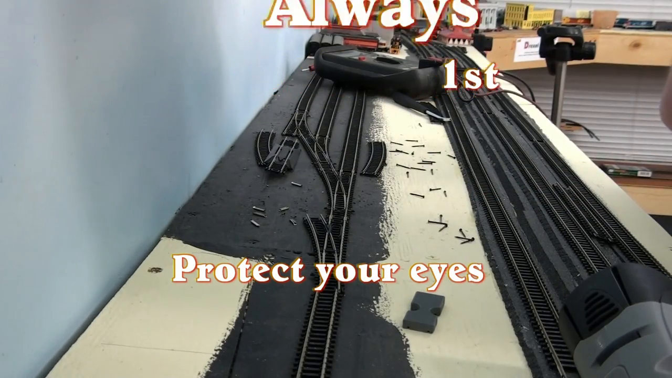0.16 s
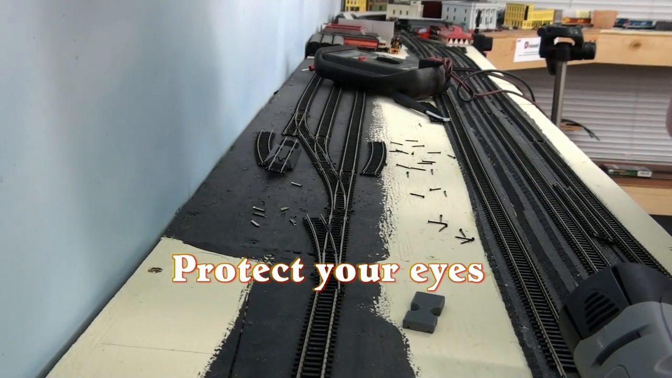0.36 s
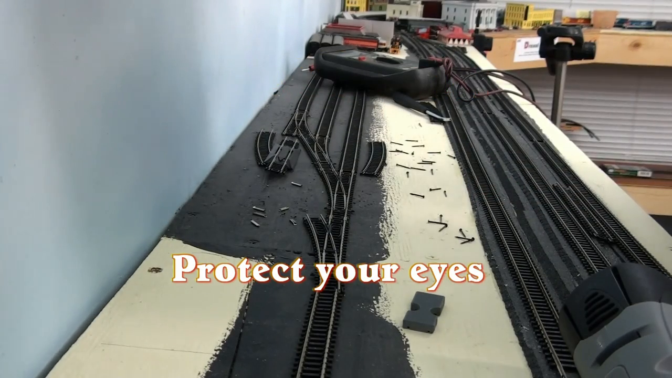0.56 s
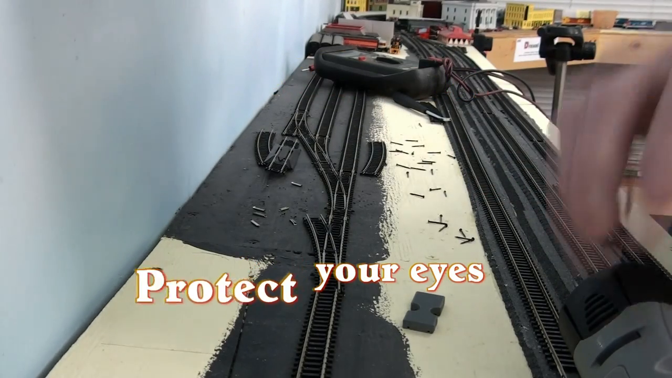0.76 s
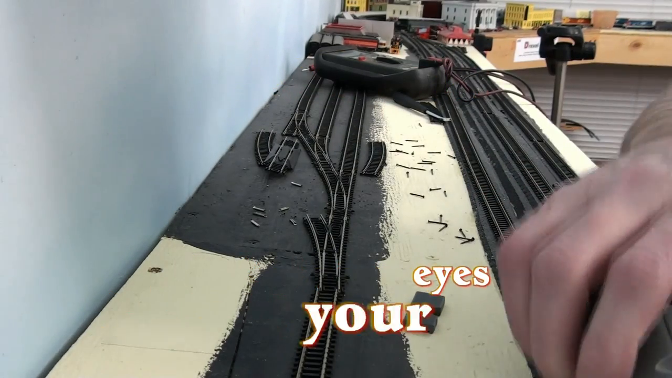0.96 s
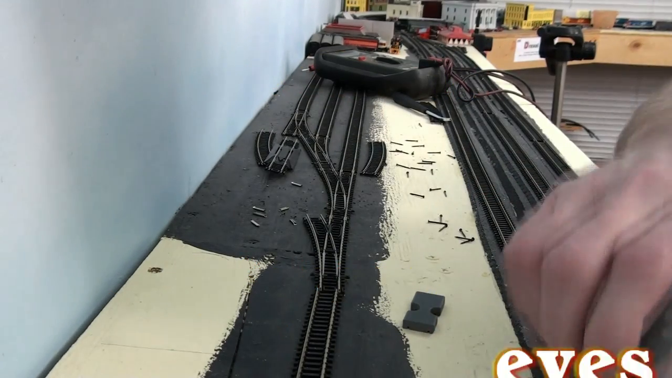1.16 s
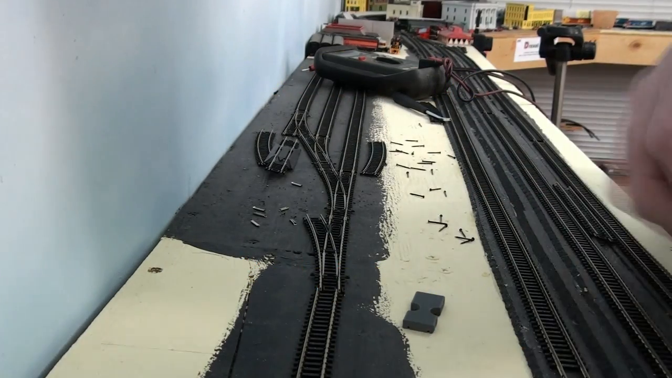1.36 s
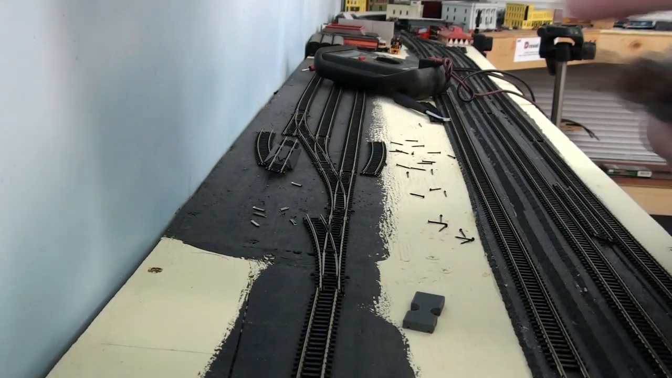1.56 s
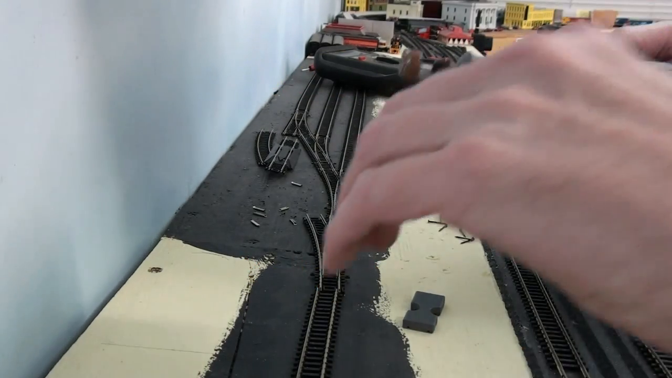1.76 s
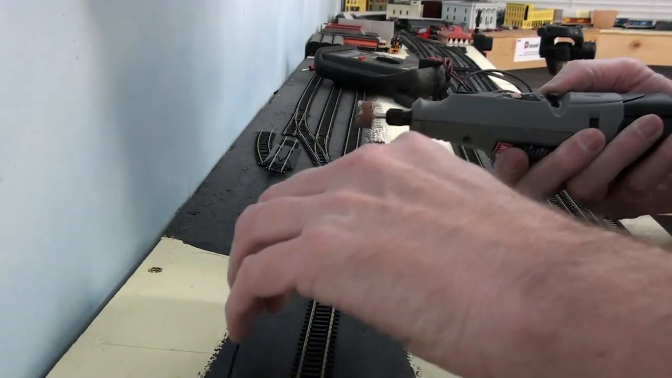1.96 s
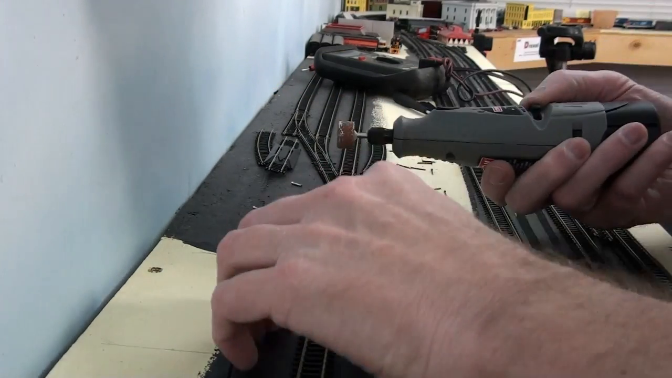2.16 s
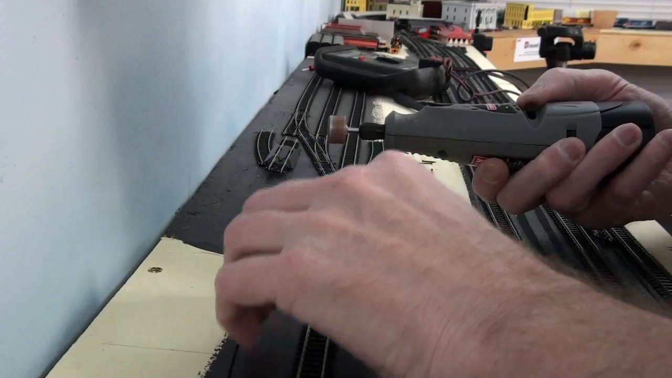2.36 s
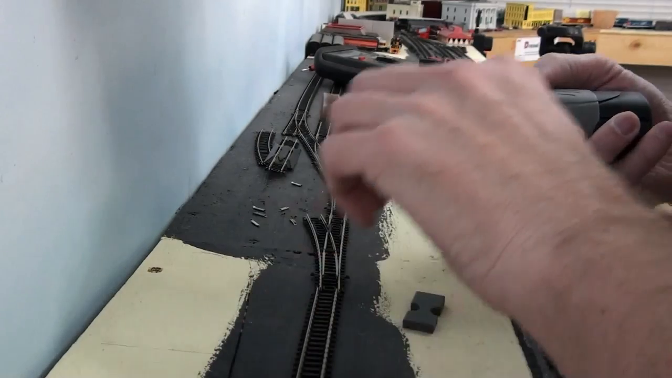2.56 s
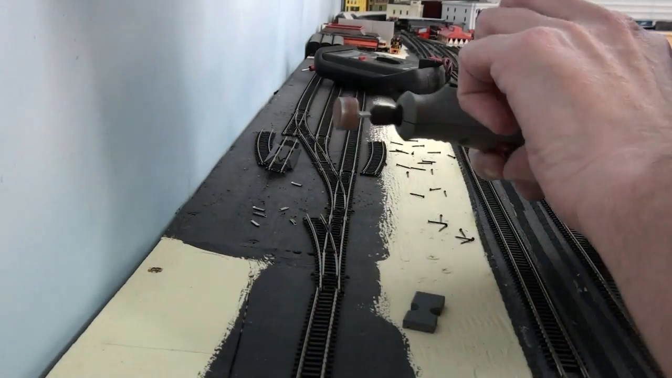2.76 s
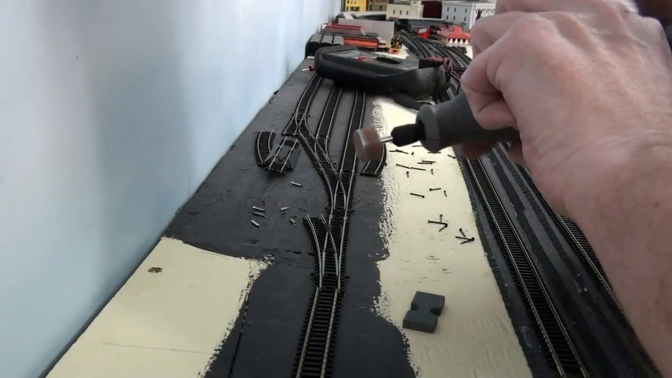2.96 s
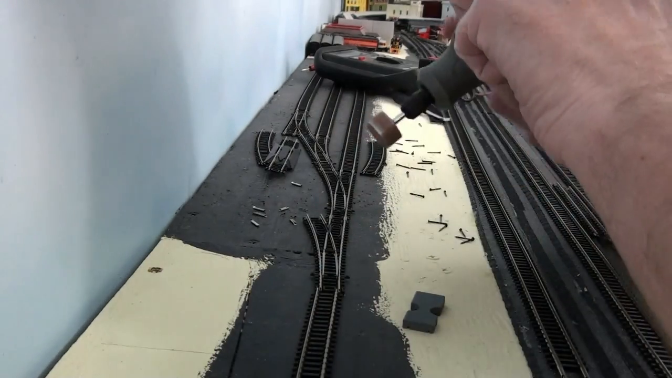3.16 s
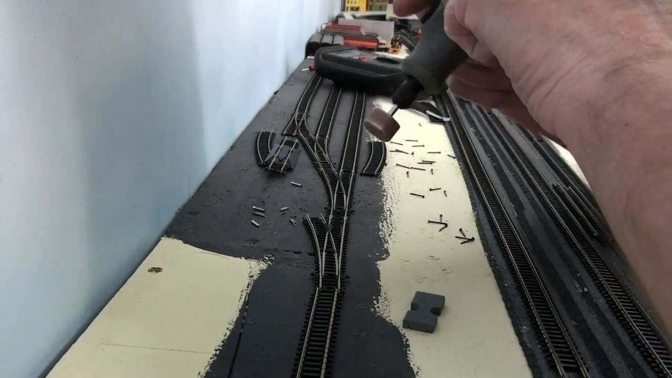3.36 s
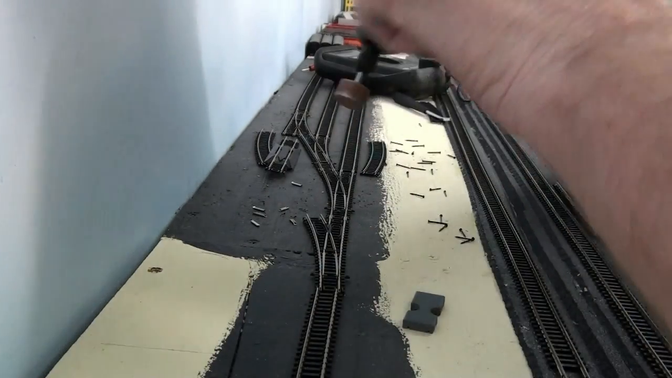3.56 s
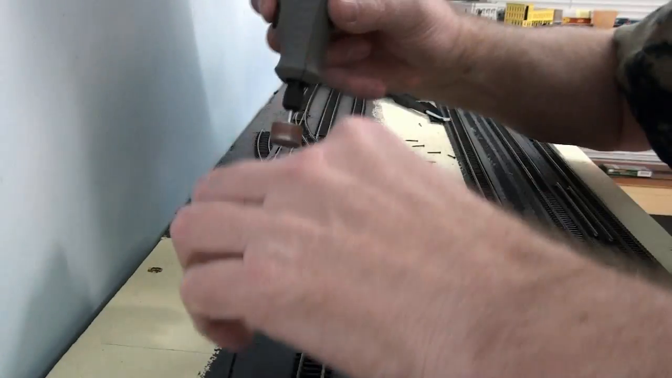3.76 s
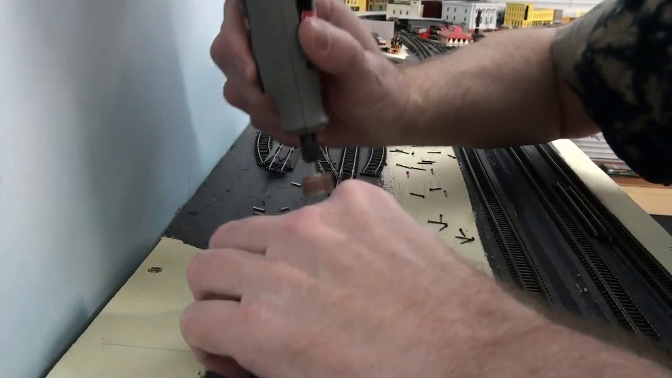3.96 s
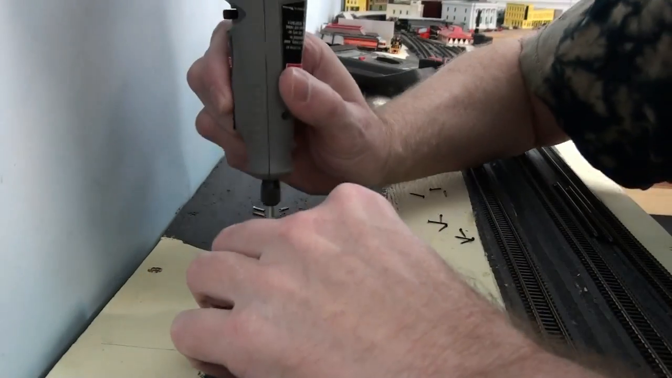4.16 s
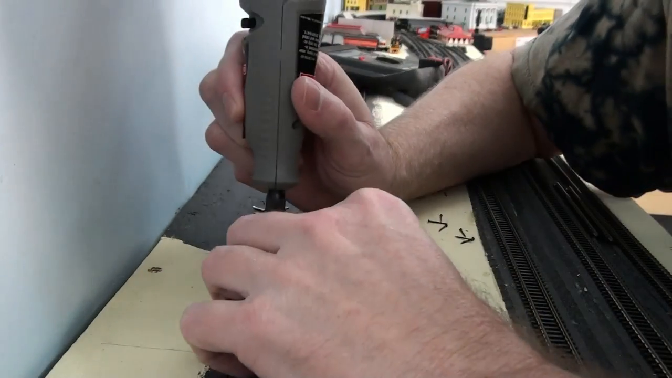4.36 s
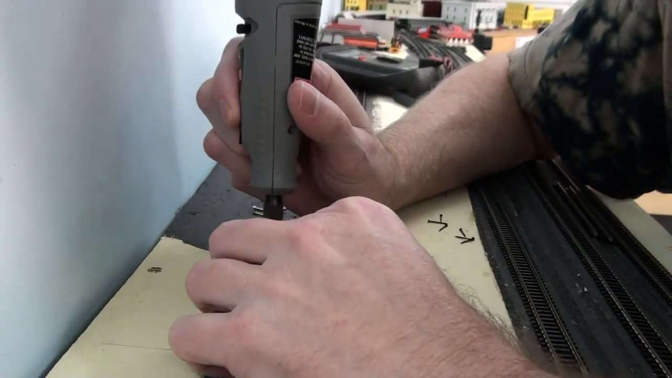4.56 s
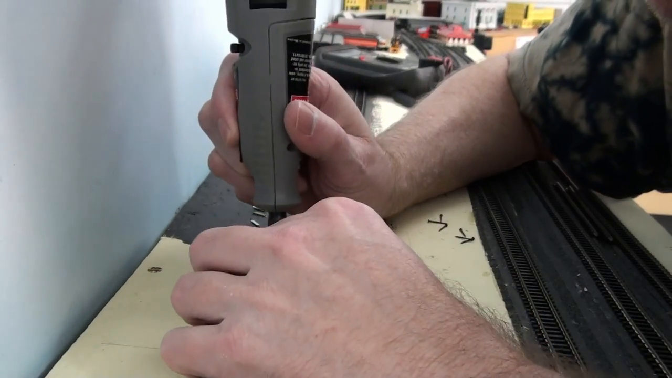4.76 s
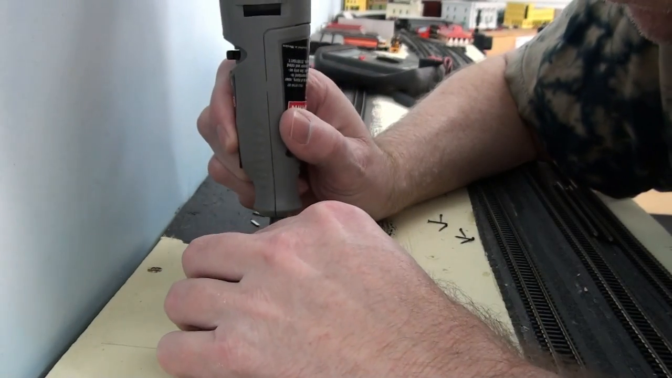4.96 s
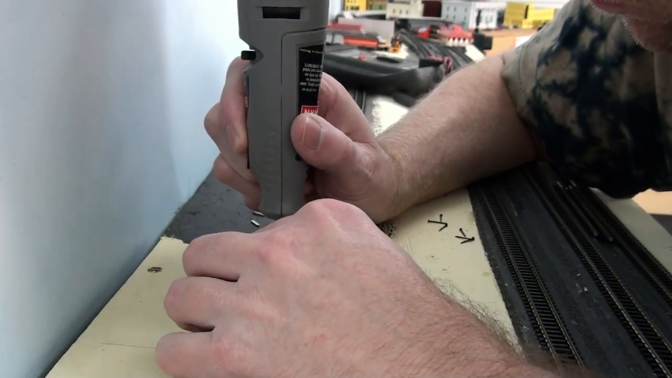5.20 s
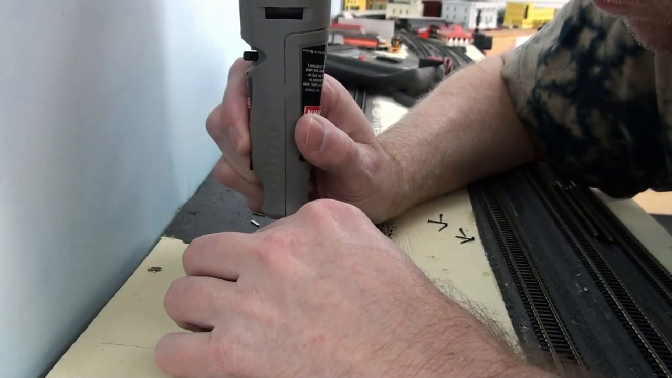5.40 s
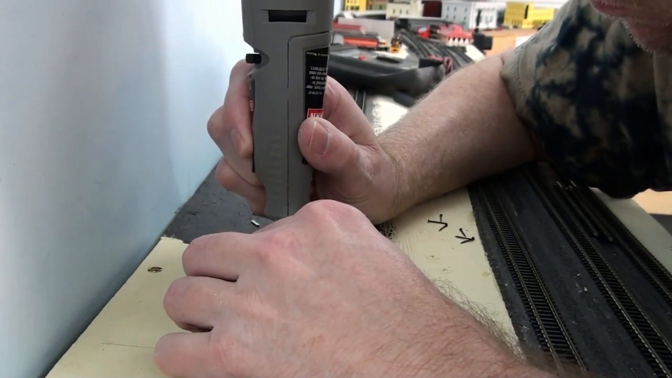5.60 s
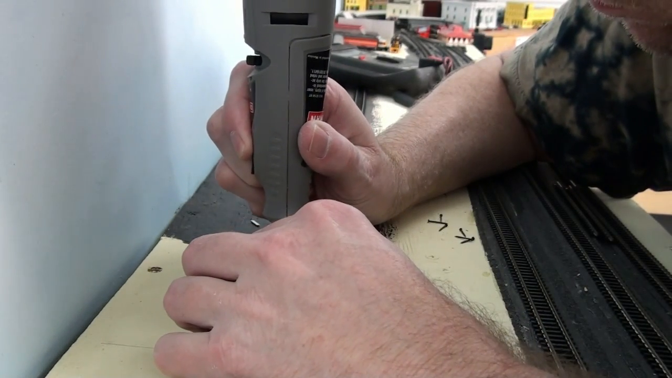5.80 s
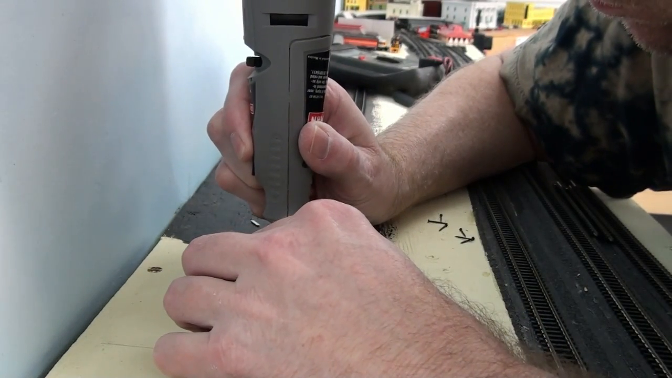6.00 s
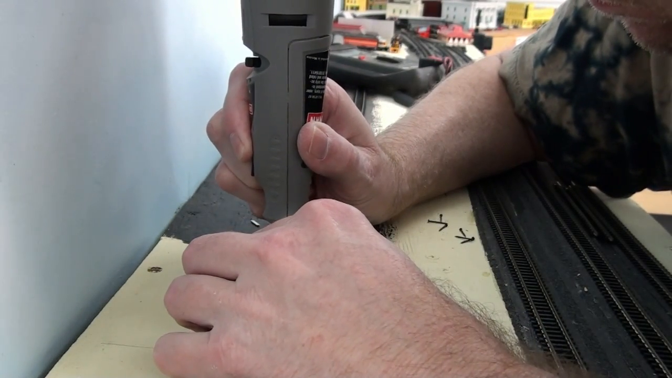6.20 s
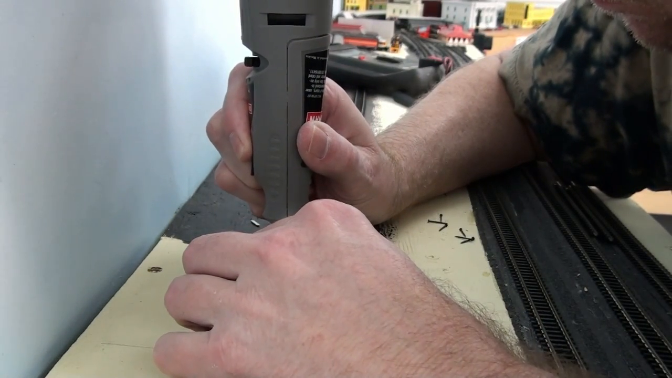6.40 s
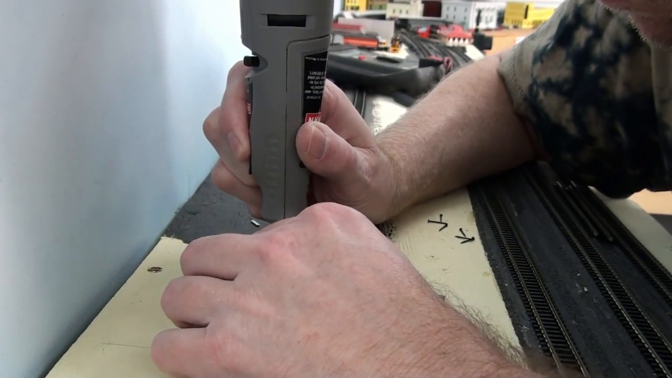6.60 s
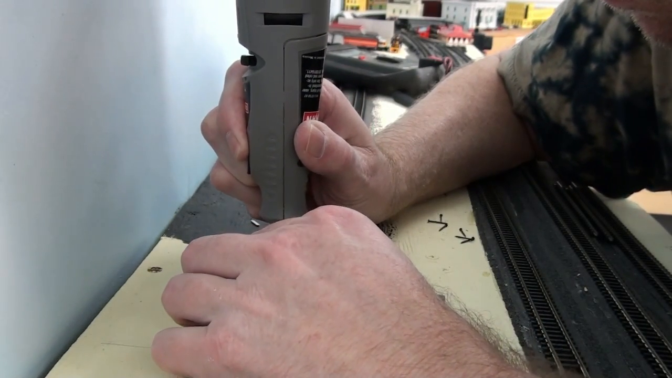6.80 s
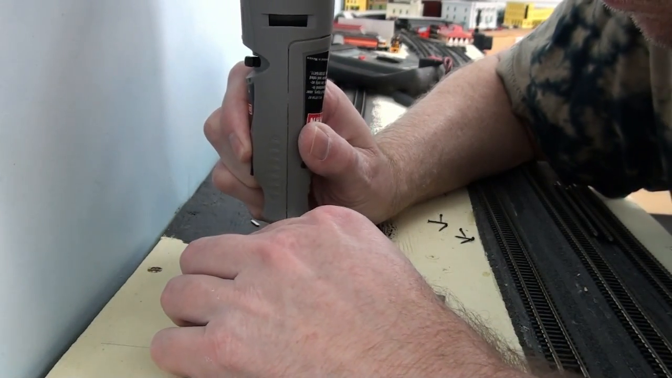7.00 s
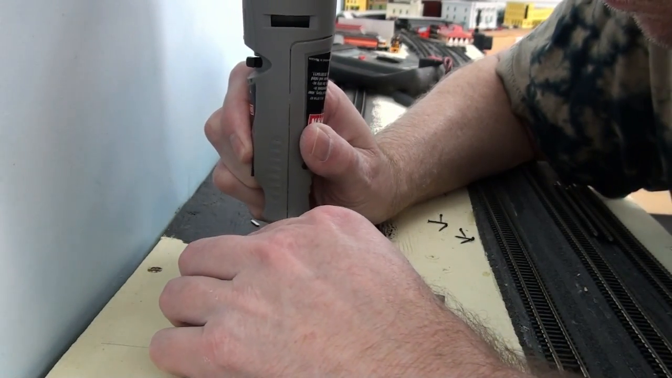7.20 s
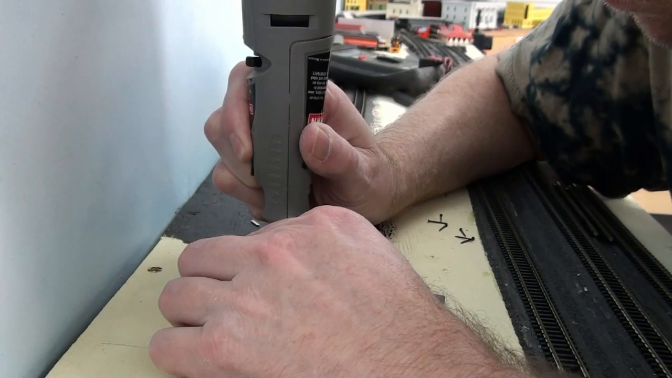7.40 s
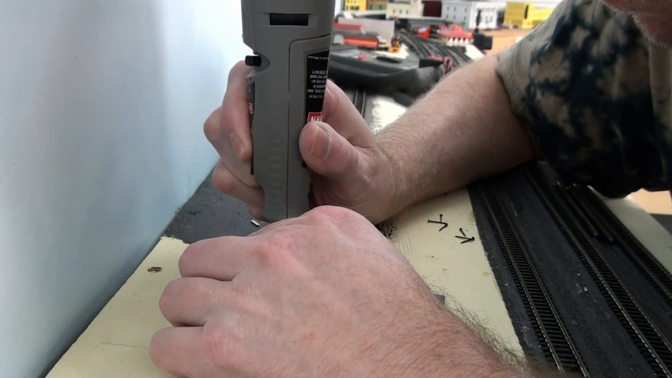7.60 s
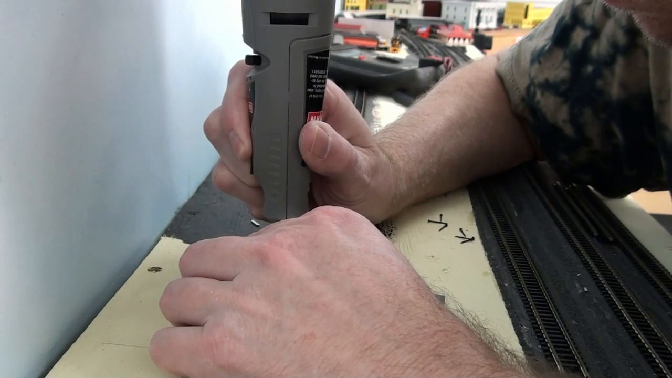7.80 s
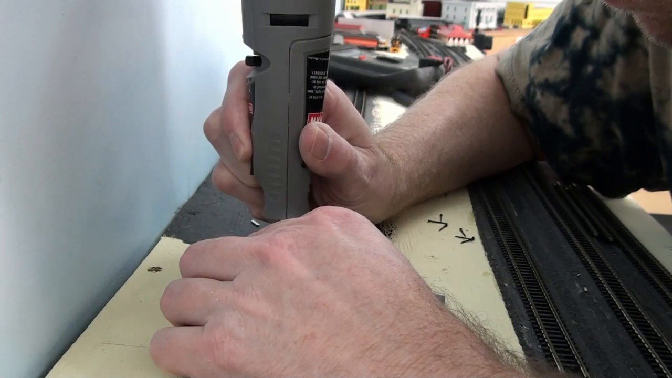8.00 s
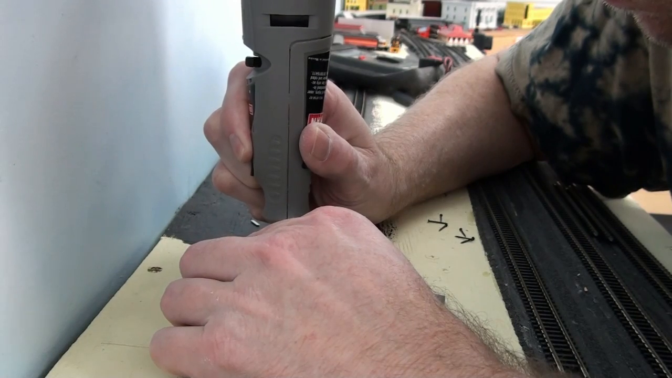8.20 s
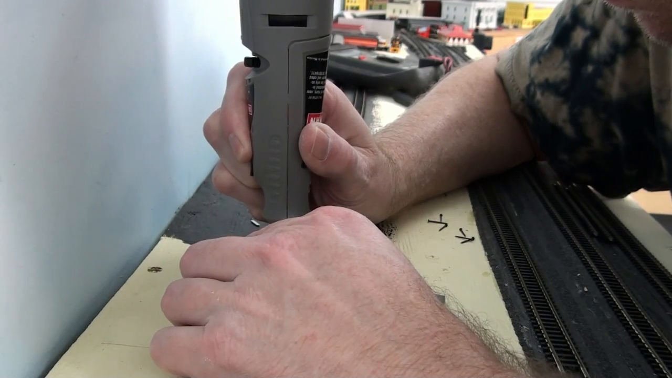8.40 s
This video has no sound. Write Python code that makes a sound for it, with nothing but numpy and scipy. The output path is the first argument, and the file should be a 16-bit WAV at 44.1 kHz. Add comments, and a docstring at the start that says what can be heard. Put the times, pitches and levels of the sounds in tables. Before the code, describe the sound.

In a quiet small room, hands rub and knock a plastic tool softly on a board. A switch clicks and a small electric motor spins up quickly into a raspy, buzzing whine. A few dull bumps follow as it is steadied upright. Then the wheel kicks in short sharp bites on a metal rail, whines free again, and finally grinds in a harsh, rattling chatter. Close stereo microphone.

```python
"""A handheld rotary tool on a model railway board, heard by a close stereo microphone in a small room.
Its motor whines in harmonics of the shaft rate over a draught of air; shell and brushes add a contact noise
that repeats every turn. The tool is picked up, switched on and turned upright over the track. Its wheel kicks
on a rail end and chatters along it, about one bite a turn: grit bursts, rail and track rattle, the board drums
and the shaft is braked. Hand strokes, knocks, board rumble and quiet room tone lie around it."""
import sys
import numpy as np
from scipy import signal
from scipy.fft import rfft, irfft
from scipy.io import wavfile
from scipy.ndimage import uniform_filter1d

SR = 44100
rng = np.random.default_rng(int(sys.argv[2]) if len(sys.argv) > 2 else 0)


def write(x):
    x = np.atleast_2d(x).T
    wavfile.write(sys.argv[1], SR, np.round(np.clip(x, -1, 1) * 32767).astype(np.int16))


N = 372644

# Room. Colour of the quiet room tone: pitch_hz, relative_level_db
ROOM_TONE = [(15, -34), (28, -12), (55, 2), (180, -3), (260, -7), (400, -6), (700, -18), (2050, -20),
             (2480, -22), (5280, -25), (13200, -26), (16000, -31)]
# Colour of the reflections from wall and board: pitch_hz, relative_level_db
WALL_COLOUR = [(60, -14), (250, -11), (500, -1), (1500, -1), (2900, 0), (4500, 3), (7000, 2), (9000, -3),
               (13000, -9)]

# Board. Modes of the board with its track: pitch_hz, decay_t60_s, relative_level_db
BOARD_MODES = [(87, 0.091, -9), (111.8, 0.47, -18.5), (160, 0.22, -8), (220, 0.12, 2.5), (251, 0.2, 4.5),
               (281, 0.045, 0), (454, 0.098, -7.5), (495, 0.39, -11.5), (530, 0.033, -5), (751, 0.12, -5),
               (822, 0.16, -13), (1118, 0.28, -10), (1432, 0.047, -6.5)]
# Resting hand shifting its weight on the board: start_s, swell_s, release_t60_s, peak_db
WEIGHT_SHIFTS = [(4.005, 0.028, 0.88, -36), (4.22, 0.072, .5, -39.5), (4.33, 0.082, 1, -43.5),
                 (4.86, 0.075, 1.0, -46)]
# Colour of the board's rumble: pitch_hz, relative_level_db
RUMBLE_COLOUR = [(25, -31), (60, 3), (100, 7), (170, 0), (245, 6.5), (330, -2), (480, -1), (750, -9),
                 (1300, -10), (4000, -35)]

# Hands. Strokes of hand and sleeve over the tool: start_s, swell_s, release_t60_s, relative_peak_db
RUBS = [(.881, 0.0085, 0.34, -35), (.93, 0.17, 0.14, -42.5), (1.22, 0.14, 0.67, -41.5),
        (1.37, .065, 0.33, -37.5), (1.49, 0.0093, 0.23, -41), (1.75, 0.061, 0.38, -49),
        (1.97, .03, 0.32, -59), (2.07, 0.033, 0.18, -57.5)]
# Grip during the pick-up: time_s, cupped_hand_hz, case_ring_db
GRIP = [(.9, 2000, -16), (1.08, 2000, -3), (1.27, 1980, -16), (1.35, 2010, -12), (1.43, 1780, -21),
        (1.52, 1860, -20), (1.82, 2100, -5)]
# Colour of skin and cloth sliding: pitch_hz, relative_level_db
SLIDE_COLOUR = [(530, -52), (900, -25), (1490, -13), (1850, -0.5), (2450, -6), (2860, -2.5), (3470, -12),
                (4200, -5), (6410, -2), (9090, 2), (10400, -3.5), (12300, -6), (16000, -52)]
# Colour of the rubbing passed to the board: pitch_hz, relative_level_db
RUB_RUMBLE_COLOUR = [(50, -7), (170, -2), (280, -6), (600, -17), (2000, -15.5)]
# Blows of hand, tool and switch: time_s, click_db, click_centre_hz, click_t60_s, board_db
KNOCKS = [(0.899, -37, 5000, .03, -38), (0.913, -24.5, 9000, 0.0072, -43), (0.992, -40, 4500, .015, -42),
          (1.1, -30.5, 374, 0.048, -29), (1.1, -35, 5000, .012, -58), (1.138, -25, 6500, 0.012, -42),
          (1.159, -37.5, 1660, 0.16, -30), (1.175, -32.5, 2450, 0.029, -34), (2.239, -39, 4450, 0.05, -33),
          (2.243, -36.5, 550, 0.093, -35.5), (2.355, -30, 7000, 0.036, -70),
          (2.364, -25.5, 1030, 0.048, -57), (2.363, -19, 8600, 0.027, -60), (4.007, -32, 600, 0.056, -30.5),
          (4.031, -28.5, 1200, 0.02, -37), (4.345, -34.5, 720, .058, -32.5), (4.385, -34, 700, 0.052, -34),
          (4.407, -26, 1010, 0.062, -34.5), (4.479, -32, 800, 0.024, -37), (4.568, -39, 746, 0.051, -50)]

# Cut. Wheel kicking on the rail end: time_s, click_db, click_centre_hz, click_t60_s, board_db
KICKS = [(6.172, -11, 3600, 0.0098, -24), (6.180, -12.5, 2800, 0.013, -24),
         (6.250, -12.5, 1640, 0.016, -18), (6.306, -9.5, 2290, 0.0073, -32),
         (6.314, -11.5, 1980, 0.016, -20)]
# Runs of bites: first_bite_s, last_bite_s, spacing_turns, relative_level_db
BITE_RUNS = [(5.992, 6.001, 1, -12), (6.052, 6.061, 1, -2), (6.070, 6.097, 1, -1), (6.106, 6.106, 1, -10),
             (6.218, 6.218, 1, -2), (6.289, 6.289, 1, -2), (6.397, 6.397, 1, -10), (7.257, 7.275, 1, -2),
             (7.353, 7.362, 1, -1), (7.405, 7.440, 1, -2), (7.458, 7.458, 1, 1), (7.475, 7.599, 1, -1),
             (7.625, 7.625, 1, 0), (7.652, 7.652, 1, -5), (7.661, 7.661, 1, 0), (7.678, 7.849, 1, 0),
             (7.858, 7.902, 1, -2), (7.919, 7.919, 1, 0), (7.937, 7.937, 1, -4), (7.955, 8.009, 2, -.5),
             (8.020, 8.037, 1, 0), (8.055, 8.090, 4, 1), (8.108, 8.108, 1, 0), (8.125, 8.144, 1, 0),
             (8.161, 8.180, 1, 0), (8.208, 8.208, 1, 1), (8.243, 8.279, 1, 0), (8.296, 8.296, 1, 1),
             (8.333, 8.350, 2, 0), (8.367, 8.447, 1, 0)]
# Cut: time_s, grit_body_gain_db, bounce (0 wheel seated, 1 hopping)
CUT = [(6.1, 4, 0.33), (7.26, -3.5, 0.4), (7.44, -4.5, 0.35), (7.48, -4, 0.043), (7.54, -0.5, .05),
       (7.63, 0.5, 0.16), (7.665, 1, 0.86), (7.69, -2, 0.99), (7.84, 1.5, 0.35), (7.92, 6, 1),
       (7.96, 1, .9), (8.08, -0.5, 0.72), (8.11, 2, .8), (8.15, 1, 0.66), (8.26, -1.5, 0.33),
       (8.44, -1.5, 0.5)]
# Colour of grit tearing at the rail: pitch_hz, relative_level_db
GRIT_COLOUR = [(350, -30), (600, 3), (650, -24), (779, -1.5), (957, -13.5), (1410, 6), (1600, 0),
               (2210, 0.5), (2870, -3), (5790, 2.5), (6370, -0.5), (8270, 3), (10500, 0.5), (14300, -17.5),
               (16000, -21)]
# Colour of the low rattle under the grit: pitch_hz, relative_level_db
RATTLE_COLOUR = [(60, -24), (150, -15), (250, 6.5), (360, -8.5), (480, 7), (650, -16.5), (1400, 4.5),
                 (5000, -41)]
# Resonances of the rail: pitch_hz, width_hz, relative_level_db
RAIL_MODES = [(2904, 37, 8), (5770, 220, 5), (8100, 690, 5)]
# Colour of the track clattering on the board: pitch_hz, relative_level_db
CLATTER_COLOUR = [(300, -18), (650, -7.5), (790, 0.5), (1020, -10), (1400, 3), (1800, -4.5), (2800, 4.5),
                  (5200, -3.5), (8000, -17.5)]

# Motor. Unloaded shaft rate once spun up, wandering as the tool is tilted: time_s, shaft_rate_hz
SHAFT_SPEED = [(2.73, 111.44), (2.81, 112.9), (2.99, 111.05), (3.11, 112.91), (3.21, 109.71),
               (3.32, 111.78), (3.71, 112.85), (3.85, 111.31), (3.91, 112.98), (4.25, 115.24),
               (4.66, 115.47), (5.41, 116.57), (6.14, 116.87), (6.68, 114.82), (7.36, 115.96)]
# Relative levels of the motor's parts: time_s, whine_db, casing_buzz_db, brush_rasp_db
MOTOR_LEVELS = [(2.38, -48, -53, -51), (2.47, -51, -53, -39.5), (2.51, -43, -49, -41.5),
                (2.75, -46, -45.5, -38), (3.05, -44.5, -41.5, -35), (3.35, -42, -40, -37.5),
                (3.75, -45.5, -42.5, -34.5), (4.05, -41, -44.5, -30.5), (4.6, -42, -45.5, -31.5),
                (5.35, -41.5, -45.5, -29), (5.9, -40.5, -46, -32), (6.4, -43, -45, -33),
                (6.75, -44.5, -45.5, -30), (7.2, -44.5, -44.5, -31), (7.6, -53, -47, -35)]
# Unbalance hum that the hands pass into the board: time_s, level_db
HUM_LEVEL = [(2.36, -66), (4.5, -64), (4.9, -53), (5.2, -47), (5.6, -43), (6.0, -40.5), (6.6, -40.5),
             (7.2, -40), (8.45, -75)]
# How the tool is held: time_s, pose (0 lying level, 1 upright on the rail)
POSE = [(3.75, 0.11), (4.15, 0.9)]
# Whine harmonics, tool level and tool upright: shaft_multiple, relative_level_db
WHINE_LEVEL = [(2, -22), (3, -24), (4, -26), (5, -30), (6, -29), (7, -22), (8, -18), (9, -3), (10, -19),
               (11, -6), (12, -1), (13, -7), (14, 0), (15, -4), (16, -8), (17, -13), (18, -8), (19, -15),
               (20, -13)]
WHINE_UPRIGHT = [(2, -17), (3, -21), (4, -21), (5, -18), (6, -22), (7, -26), (8, -21), (9, 1), (10, -4.5),
                 (11, -8), (12, -4), (13, -4), (14, -4.5), (15, -3), (16, -5), (17, -18), (18, -6),
                 (19, -16), (20, -23)]
# Colour of the draught: pitch_hz, relative_level_db
DRAUGHT_COLOUR = [(60, -32), (250, -11.5), (750, -19), (1200, -12), (2000, -11.5), (2500, -15), (5000, -34)]
# Hollow between hand and vents, shifting with the grip: time_s, centre_hz, lift_db
HOLLOW = [(2.38, 1274, 14), (2.55, 1315, 14), (2.68, 1340, 9), (2.85, 1430, 5), (3.08, 1780, 8.5),
          (3.22, 1640, 7), (3.5, 1624, 9.5), (3.7, 1450, 1), (3.87, 1716, 10), (4.15, 1850, 2),
          (4.6, 1730, 2), (5.7, 1750, 2), (6.3, 1760, 1), (6.7, 1750, -1)]
# Colour of casing and brushes, tool level and tool upright: pitch_hz, relative_level_db
CASING_LEVEL = [(1410, -25), (2400, -16), (3180, -16), (3700, -5), (4620, -6.5), (4950, -2), (5300, -8),
                (5750, -12), (6150, -11.5), (7000, -10.5), (9100, -21), (15400, -120)]
CASING_UPRIGHT = [(1400, -79), (2500, -7), (2900, -4.5), (3150, 2.5), (3550, -3), (3850, 6), (4250, -1),
                  (4850, 2), (5350, -3.5), (5930, -11), (7000, -33), (9100, -30), (15400, -82)]
BRUSH_LEVEL = [(3820, -21), (6500, -2.5), (7200, -3), (7790, 6.5), (8210, 5.5), (9910, 1.5), (10700, 3),
               (14800, -15), (16000, -64)]
BRUSH_UPRIGHT = [(3820, -54), (6500, -18.5), (6700, -9.5), (7250, -10), (7640, -4.5), (9510, 1.5),
                 (9910, -3), (10300, -2.5), (11300, -7), (12300, -14), (12900, -31), (16000, -23.5)]
# Armature whistles that pass as the grip shifts: shaft_multiple, start_s, end_s, relative_level_db
WHISTLES = [(39, 2.58, 2.8, -45), (37, 2.66, 3.08, -48), (51, 2.78, 3.12, -47), (36, 2.88, 3.08, -45.5),
            (42, 3.14, 3.32, -46), (45, 3.14, 3.45, -46.5), (40, 3.14, 3.32, -49), (36, 3.29, 3.55, -45),
            (30, 3.54, 3.73, -51), (60, 3.55, 3.85, -48), (14, 4.1, 4.55, -49), (33, 4.12, 4.52, -46),
            (68, 4.15, 4.55, -46), (36, 4.4, 6, -52), (45, 4.7, 6, -51), (39, 5.17, 5.9, -50),
            (72, 5.15, 5.9, -43), (10, 5.5, 6, -50), (45, 6.35, 7.3, -48), (33, 6.45, 7.25, -49),
            (28, 6.5, 7.25, -54), (68, 6.5, 7.25, -47), (36, 6.5, 7.35, -46)]
# Shell's main resonance, moving with the fingers: time_s, centre_hz, relative_level_db
SHELL = [(2.4, 3900, -44), (2.55, 4150, -56), (2.63, 4000, -52), (2.73, 4000, -39.5), (2.83, 4050, -41),
         (2.91, 4000, -39), (3.05, 4100, -35), (3.2, 4750, -41), (3.33, 4250, -36), (3.46, 4270, -43),
         (3.58, 4270, -43), (3.68, 4250, -37), (3.77, 4500, -54), (4.0, 4440, -48)]

SWITCH_ON_S = 2.36
BITES_PER_S = 112.5  # nominal, about the loaded shaft rate


def undb(db):
    """Decibels to gain."""
    return np.exp(np.asarray(db) * (np.log(10) / 20))


def unit(x):
    """Scale to rms 1."""
    return x / np.sqrt(np.mean(x ** 2))


def steady(x):
    """Hold the short-term rms near 1."""
    return x / np.sqrt(uniform_filter1d(x ** 2, SR // 8))


def curve(table, column=1):
    """One column of a table at every sample."""
    rows = np.array(table, float)
    return np.interp(np.arange(N) / SR, rows[:, 0], rows[:, column])


def walk(rate):
    """Random drift through `rate` knots a second, spread near 1."""
    knots = rng.standard_normal(8192)
    return np.interp(np.arange(N) * (rate / SR), np.arange(len(knots)), knots)


def colour(x, points, size=2048):
    """Causal minimum-phase filter through (Hz, dB) points that keeps the power of white noise."""
    hz, db = np.array(sorted(points), float).T
    bins = np.maximum(np.fft.rfftfreq(size, 1 / SR), 1)
    gain = undb(np.interp(np.log(bins), np.log(hz), db))
    # folding the cepstrum forward makes the response causal
    cepstrum = irfft(np.log(gain))
    cepstrum[1:size // 2] *= 2
    cepstrum[size // 2 + 1:] = 0
    response = irfft(np.exp(rfft(cepstrum)))
    return signal.oaconvolve(x, response / np.linalg.norm(response))[:len(x)]


def resonate(x, centre_hz, width_hz):
    """Band-pass whose centre follows a curve: shift down, smooth, shift back."""
    carrier = np.exp(2j * np.pi * np.cumsum(centre_hz) / SR)
    pole = np.exp(-np.pi * width_hz / SR)
    smoothed = signal.lfilter([1 - pole], [1, -pole], x / carrier)
    return 2 * np.real(carrier * smoothed)


def fade(t, t60):
    """Exponential decay by 60 dB in t60 seconds."""
    return np.exp(-np.log(1000) * t / t60)


def add(track, s, sound):
    """Mix a sound into a track at time s."""
    i = min(int(s * SR), N)
    track[i:i + len(sound)] += sound[:N - i]


def stroke(start_s, swell_s, t60):
    """Envelope that swells evenly to 1, then dies away."""
    t = np.arange(N) / SR - start_s
    return np.clip(t / swell_s, 0, 1) * fade(np.maximum(t - swell_s, 0), t60)


def strokes(rows):
    """Joint envelope of several strokes; their powers add."""
    return np.sqrt(sum((undb(db) * stroke(s, swell_s, t60)) ** 2 for s, swell_s, t60, db in rows))


def air(mid_db=-56.3, side_db=-5):
    """Quiet room tone: shared noise plus opposed noise without bass, so the bass is alike in both ears."""
    mid, side = (unit(colour(rng.standard_normal(N), ROOM_TONE)) for _ in range(2))
    side = signal.sosfilt(signal.butter(1, 700, "high", fs=SR, output="sos"), side)
    return undb(mid_db) * (mid + undb(side_db) * side * np.array([[1], [-1]]))


def room(x, t60=0.21, mid_db=-15, side_db=-8.5):
    """Dense early reflections; those from the side wall reach the two microphones in opposite phase."""
    t = np.arange(SR // 3) / SR
    tails = []
    for decay in (t60, t60 / 2):
        noise = rng.standard_normal(len(t)) * fade(t, decay) * (t > .001)
        tails.append(colour(noise, WALL_COLOUR))
    mid, side = (signal.oaconvolve(x, tail / np.linalg.norm(tail))[:N] for tail in tails)
    return undb(mid_db) * mid + undb(side_db) * side * np.array([[1], [-1]])


def board_ring():
    """The board's answer to one push: a sum of decaying modes, peak 1."""
    t = np.arange(SR // 3) / SR
    ring = np.zeros(len(t))
    for k, (hz, t60, db) in enumerate(BOARD_MODES):
        ring += (-1) ** k * undb(db) * fade(t, t60) * np.sin(2 * np.pi * hz * t)
    return ring / np.abs(ring).max()


def board_rumble(shake_db=-29.5, shake_rise_s=0.016, shake_t60=0.37):
    """Low noise: the board rumbles under the shifting hand and shakes on after each kick of the wheel."""
    shakes = [(s, shake_rise_s, shake_t60, shake_db) for s, *_ in KICKS]
    return strokes(WEIGHT_SHIFTS + shakes) * colour(rng.standard_normal(N), RUMBLE_COLOUR)


def handling(flutter_db=0.5, body_db=-9, low_width_hz=260, low_db=-8, high_hz=4500, high_width_hz=450,
             slip_db=4):
    """Skin and cloth stick and slip over the plastic case, ring in the grip and rumble faintly in the board."""
    slips = unit(rng.standard_normal(N) * undb(slip_db * walk(900)))
    cupped = undb(low_db) * unit(resonate(slips, curve(GRIP, 1), low_width_hz))
    case_hz = high_hz * (1 + 0.034 * walk(11.8))
    case = undb(curve(GRIP, 2)) * unit(resonate(slips, case_hz, high_width_hz))
    sliding = unit(colour(slips, SLIDE_COLOUR) + cupped + case)
    rumble = colour(rng.standard_normal(N), RUB_RUMBLE_COLOUR)
    return strokes(RUBS) * undb(flutter_db * walk(69.5)) * (sliding + undb(body_db) * rumble)


def blows(rows, skirt_db, top_hz, soft_hz=420, settle_t60=0.054, settle=0.067, thump_db=-3, thump_t60=0.085):
    """Each blow is a short crack and a dry thump; the weight behind it settles and sets the board ringing."""
    out, ring = np.zeros(N), board_ring()
    t = np.arange(SR // 5) / SR
    soft = signal.butter(3, soft_hz, fs=SR, output="sos")
    for s, click_db, hz, t60, board_db in rows:
        crack, wobble, dull = rng.standard_normal((3, len(t)))
        band = [(hz / 16, 3 * skirt_db), (hz / 4, skirt_db / 2), (hz, 0), (hz * 3, skirt_db),
                (hz * 10, 3 * skirt_db)]
        add(out, s, undb(click_db) * colour(crack * fade(t, t60), band))
        push = (t == 0) + settle * wobble * fade(t, settle_t60)
        thud = signal.sosfilt(soft, signal.fftconvolve(push, ring))
        thump = signal.sosfilt(soft, dull * fade(t, thump_t60))
        add(out, s, undb(board_db) * thud / np.abs(thud).max())
        add(out, s, undb(board_db + thump_db) * thump / np.abs(thump).max())
    # no contact is instantaneous, so the very top is rounded
    return signal.sosfilt(signal.butter(3, top_hz, fs=SR, output="sos"), out)


def bite_train(jitter_s=.0005, scatter_db=.5):
    """One pulse for each bite of the wheel's high spot; a hopping wheel bites out of step."""
    bites = np.zeros(N)
    cut_s, _, bounce = np.array(CUT).T
    for first, last, spacing, db in BITE_RUNS:
        count = round((last - first) * BITES_PER_S / spacing) + 1
        times = np.linspace(first, last, count)
        for s, (late, force) in zip(times, rng.standard_normal((count, 2))):
            late_s = jitter_s * np.interp(s, cut_s, bounce) * late
            add(bites, s + late_s, undb([db + scatter_db * force]))
    return bites


def rail_ring(x, wander=0.017):
    """The rail's resonances; their pitches wander a little, as the wheel moves along it."""
    ring = np.zeros(N)
    for hz, width_hz, db in RAIL_MODES:
        ring += undb(db) * resonate(x, hz * (1 + wander * walk(13.0)), width_hz)
    return ring


def clatter(bites, clatter_db=-2.5, t60=.06):
    """The track answers each bite with one waveform, so even bites make a pitched buzz."""
    t = np.arange(SR // 20) / SR
    answer = colour(rng.standard_normal(len(t)) * fade(t, t60), CLATTER_COLOUR)
    return undb(clatter_db) * signal.oaconvolve(bites, answer / np.linalg.norm(answer))[:N]


def grinding(bites, grit_db=-17.5, push_db=-24.0, grain_db=0.8, rattle_db=-32, body_hz=2400,
             rise_s=.0014, tail_db=-18, tail_t60=.48, depth_scatter_db=2, hop_scatter_db=3.5):
    """The wheel's high spot bites: each bite is a burst of grit that rings the rail, and a push on the board."""
    t = np.arange(SR // 10) / SR
    # each bite swells and lets go within a few ms; the rail goes on rattling
    contact = t / rise_s * np.exp(1 - t / rise_s) + undb(tail_db) * fade(t, tail_t60)
    pressure = np.sqrt(np.abs(signal.oaconvolve(bites ** 2, contact ** 2)[:N]))
    grains = unit(rng.standard_normal(N) * undb(grain_db * rng.standard_normal(N)))
    grit = pressure * grains
    # a deeper cut has more body, and no two bites are equally deep
    depth = undb(curve(CUT, 1) + depth_scatter_db * walk(BITES_PER_S))
    tearing = colour(grit, GRIT_COLOUR)
    body = signal.sosfiltfilt(signal.butter(2, body_hz, fs=SR, output="sos"), tearing)
    tearing = tearing + (depth - 1) * body + rail_ring(pressure * rng.standard_normal(N))
    rattle = depth * colour(grit, RATTLE_COLOUR)
    # a hopping wheel pushes unevenly
    pushes = bites * undb(hop_scatter_db * curve(CUT, 2) * np.clip(walk(60), -2, 1))
    drumming = signal.oaconvolve(pushes, board_ring())[:N]
    return (undb(grit_db) * tearing + undb(rattle_db) * rattle + undb(push_db) * drumming
            + clatter(bites * depth))


def shaft(bites, spin_up_hz=34.84, inertia_s=.13, bite_sag_hz=.29, kick_sag_hz=1.7):
    """Shaft rate and the part lost to load, Hz: it starts slow, is braked by bites and kicks, and recovers."""
    braking = bite_sag_hz * (bites > 0)
    for s, *_ in KICKS:
        add(braking, s, [kick_sag_hz])
    sag_hz = signal.lfilter([1], [1, -np.exp(-1 / (inertia_s * SR))], braking)
    since_on = np.maximum(np.arange(N) / SR - SWITCH_ON_S, 0)
    shortfall_hz = spin_up_hz * np.exp(-since_on / inertia_s)
    return curve(SHAFT_SPEED) - shortfall_hz - sag_hz, sag_hz


def scrape(turns, drift, rough, count=150, size=1024):
    """A contact pattern that repeats every turn and slowly changes, plus fresh friction noise."""
    shape = np.exp(2j * np.pi * rng.random(count))
    chance = rng.standard_normal((size, count)) + 1j * rng.standard_normal((size, count))
    wear = signal.lfilter([.25], [1, -.94], chance, axis=0)  # one row a turn
    pattern = irfft(shape + drift * wear, size).ravel()
    contact = unit(np.interp(turns * size, np.arange(len(pattern)), pattern))
    return unit(contact + rough * rng.standard_normal(N))


def off_the_hand(x, pose, lag_s=0.0014, sway_s=.00007, bounce=0.44):
    """Fingers and forearm throw back close echoes that mottle the treble; they settle as the tool turns upright."""
    samples, out = np.arange(N), x
    for path in np.sqrt([1, 3, 8]):
        lag = path * (lag_s + sway_s * (1.3 - pose) * walk(4))
        out = out + bounce * (1 - .5 * pose) * np.interp(samples - lag * SR, samples, x)
    return steady(out)


def casing_buzz(loose, seated, pose):
    """The shell radiates the contact noise with a colour that depends on how it is held."""
    level = np.sqrt(1 - pose) * colour(loose, CASING_LEVEL)
    upright = np.sqrt(pose) * colour(seated, CASING_UPRIGHT)
    return off_the_hand(level + upright, pose)


def brush_rasp(loose, seated, turns, shaft_hz, pose, squeak_hz=9520, squeak_db=-8, press_depth=1.0):
    """Brush noise; upright, the brushes press harder at one spot of every turn, where their holder squeaks."""
    spot = np.exp(4 * (np.cos(2 * np.pi * turns) - 1))
    rasp = unit(seated * (1 + press_depth * spot))
    since_spot = (turns - np.round(turns)) / shaft_hz
    squeak = unit(spot * np.sin(2 * np.pi * squeak_hz * since_spot + 1.0 * walk(90)))
    squeak = squeak * undb(squeak_db + 4.1 * walk(5.2))
    level = np.sqrt(1 - pose) * colour(loose, BRUSH_LEVEL)
    upright = np.sqrt(pose) * (colour(rasp, BRUSH_UPRIGHT) + squeak)
    return off_the_hand(level + upright, pose)


def shell_ring(turns, pose, ring_db=-6, width_hz=600):
    """A shell resonance picks out harmonics, wanders as the fingers shift and dies as the tool turns upright."""
    centre = curve(SHELL, 1)
    bearing = scrape(turns, drift=.3, rough=.15)
    once = resonate(bearing, centre, width_hz)
    ring = steady(resonate(once, centre, width_hz))
    lying = (pose.max() - pose) / np.ptp(pose)
    return ring * undb(ring_db + curve(SHELL, 2)) * lying


def whistles(turns, whistle_db=-0.3, waver_db=1.5, fade_s=0.077):
    """Clean overtones, mostly multiples of the armature's three poles; each swells, holds and fades."""
    t, out = np.arange(N) / SR, np.zeros(N)
    for k, start_s, end_s, db in WHISTLES:
        swell = np.clip(np.minimum(t - start_s, end_s - t) / fade_s + .5, 0, 1)
        tone = np.sin(2 * np.pi * (k * turns + rng.random()))
        out += swell * undb(db + waver_db * walk(9)) * tone
    return np.sqrt(2) * undb(whistle_db) * out


def whine(turns, shaft_hz, pose, waver_db=4.0, hollow_width_hz=170, draught_db=-13, hollow_draught_db=-15,
          clear_hz=108, tone_db_per_hz=1.5):
    """Armature and fan: harmonics emerge from a draught as the shaft gains speed; the hand's hollow colours both."""
    tones = np.zeros(N)
    centre, lift_db = curve(HOLLOW, 1), curve(HOLLOW, 2)
    for (k, level_db), (_, upright_db) in zip(WHINE_LEVEL, WHINE_UPRIGHT):
        db = level_db + pose * (upright_db - level_db) + waver_db * walk(5)
        db += lift_db / (1 + ((k * shaft_hz - centre) / hollow_width_hz) ** 2)
        tones += undb(db) * np.sin(2 * np.pi * (k * turns + 0.54 * rng.random()))
    draught = colour(rng.standard_normal(N), DRAUGHT_COLOUR)
    hollow_tone = walk(260) * np.sin(2 * np.pi * np.cumsum(centre) / SR)
    hollow = hollow_tone * np.maximum(undb(lift_db) - 1, 0)
    # below clear_hz the tones sink into the draught
    clear = undb(tone_db_per_hz * np.minimum(shaft_hz - clear_hz, 0))
    return steady(clear * steady(tones) + undb(draught_db) * draught + undb(hollow_draught_db) * hollow)


def motor(bites, flutter=0.00057, start_flutter=0.0122, casing_db=1, brush_db=-0.68, whine_db=3.0,
          load_db_per_hz=0.08):
    """All motor sounds share one turning shaft; load slows it and makes them all very slightly louder."""
    pose = curve(POSE)
    shaft_hz, sag_hz = shaft(bites)
    running = (np.arange(N) / SR > SWITCH_ON_S) * undb(load_db_per_hz * sag_hz)
    # the shaft speed flutters, more while the tool is held in the air and most while it spins up
    unsteady = flutter * (2 - pose) + start_flutter * stroke(SWITCH_ON_S, 0.047, 0.63)
    turns = np.cumsum(shaft_hz * (1 + unsteady * walk(40))) / SR
    loose = scrape(turns, drift=1.0, rough=0.55)
    seated = scrape(turns, drift=0.94, rough=0.51)
    hum = np.sqrt(2) * np.sin(2 * np.pi * turns) * undb(curve(HUM_LEVEL))
    whining = whine(turns, shaft_hz, pose) * undb(whine_db + curve(MOTOR_LEVELS, 1))
    buzzing = casing_buzz(loose, seated, pose) * undb(casing_db + curve(MOTOR_LEVELS, 2))
    rasp_db = brush_db + curve(MOTOR_LEVELS, 3) + 0.92 * walk(25) + 0.97 * walk(8)
    rasping = brush_rasp(loose, seated, turns, shaft_hz, pose) * undb(rasp_db)
    return running * (hum + whistles(turns) + shell_ring(turns, pose) + whining + buzzing + rasping)


def scene():
    """Tool and blows sit slightly left of centre, the rubbing hands on the right, all in one small room."""
    bites = bite_train()
    kicks = blows(KICKS, skirt_db=-9, top_hz=11000)
    knocks = blows(KNOCKS, skirt_db=-11, top_hz=12200)
    tool = motor(bites) + grinding(bites) + knocks + kicks + undb(-8) * rail_ring(kicks)
    hands = handling()
    sides = np.array([[.5], [-.5]])  # left, right
    direct = tool * undb(1.2 * sides) + hands * undb(-2.5 * sides)
    # keep the rumble above about 42 Hz
    deep_cut = signal.butter(3, 42, "high", fs=SR, output="sos")
    rumble = signal.sosfilt(deep_cut, board_rumble())
    return direct + room(tool + hands) + rumble + air()


def record(dry, top_hz=15800):
    """The microphone passes everything up to its steep top edge."""
    return signal.sosfilt(signal.ellip(10, .1, 70, top_hz, fs=SR, output="sos"), dry)


dry = scene()
out = record(dry)
write(out)
```